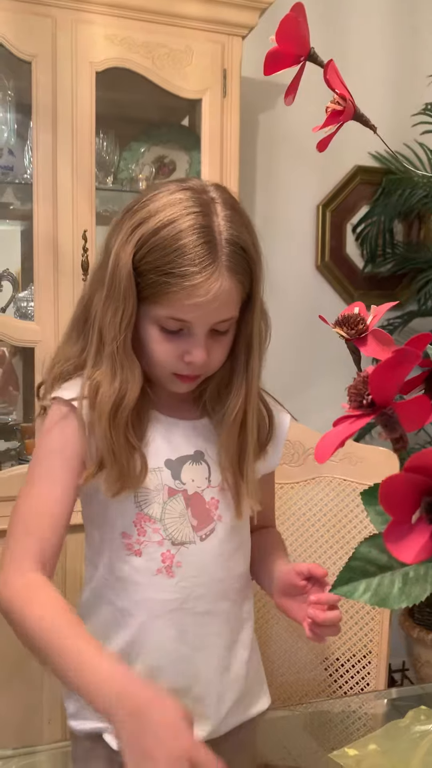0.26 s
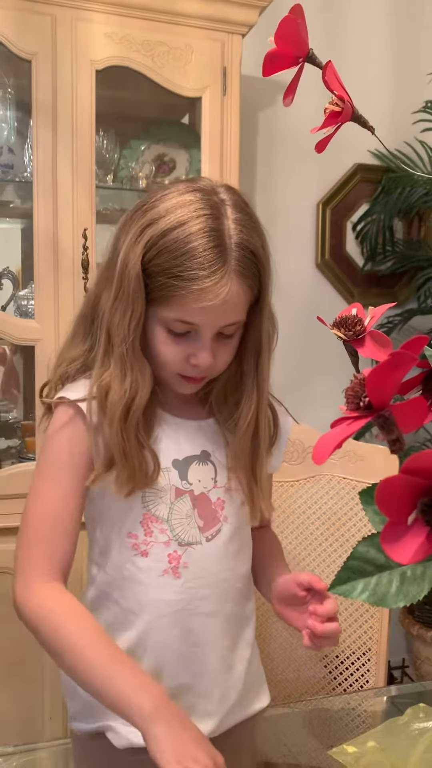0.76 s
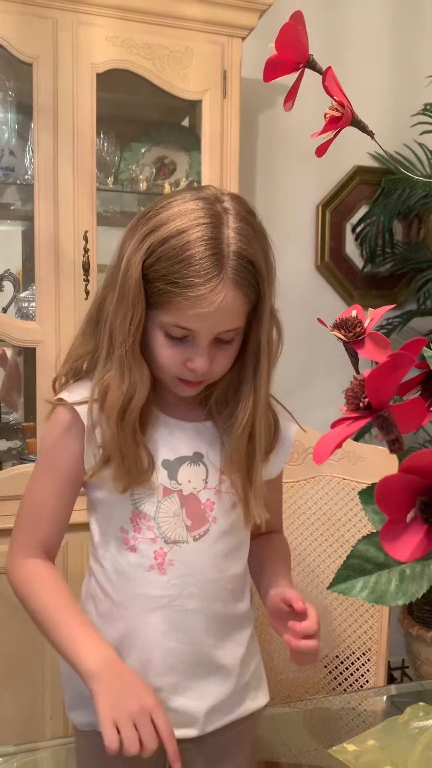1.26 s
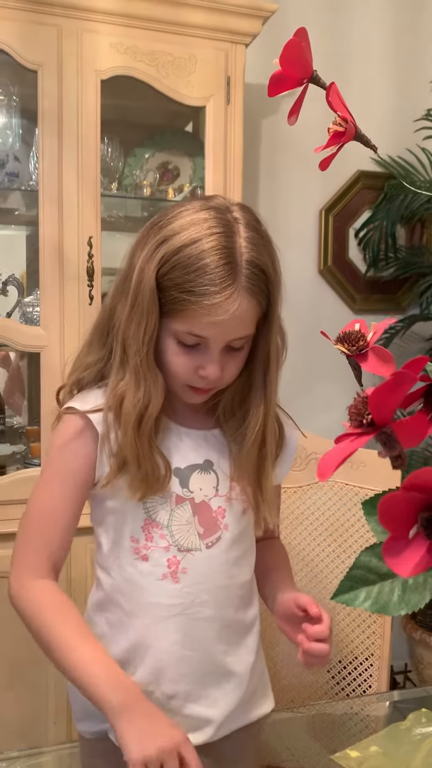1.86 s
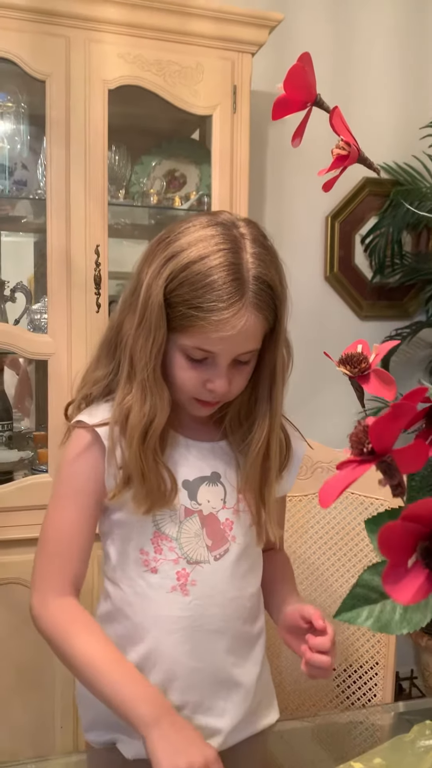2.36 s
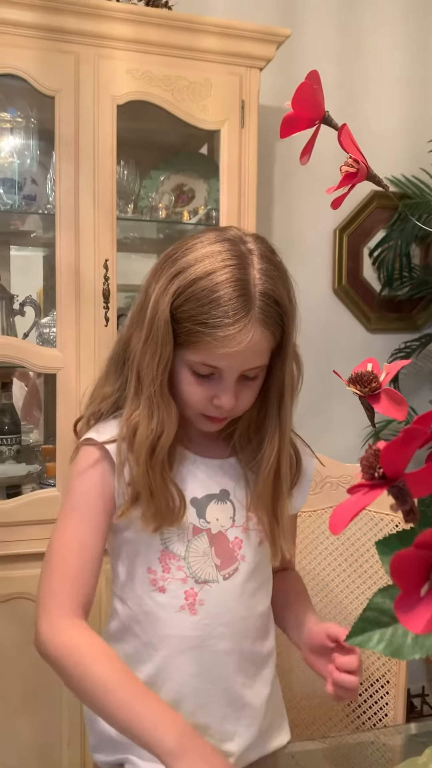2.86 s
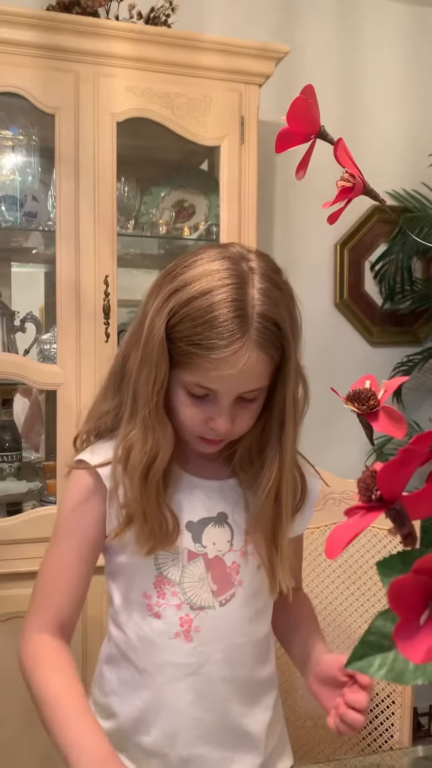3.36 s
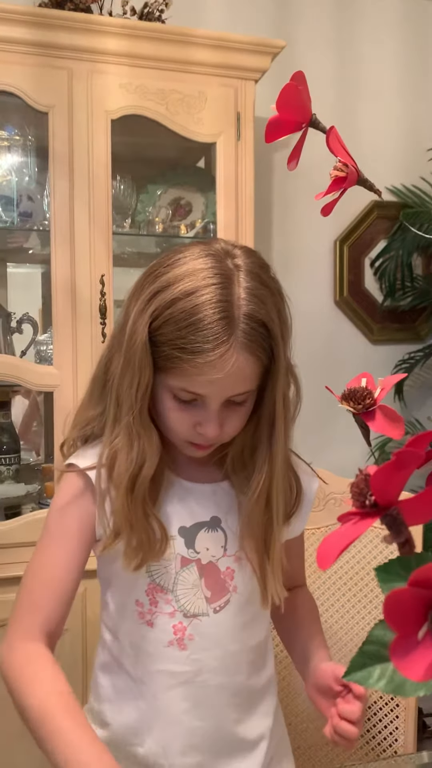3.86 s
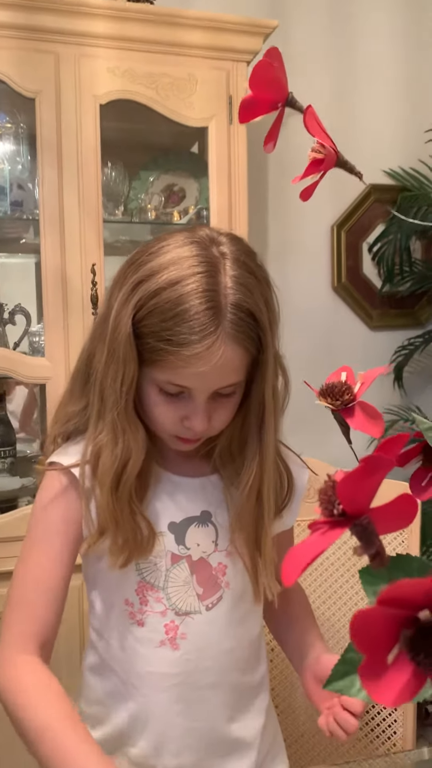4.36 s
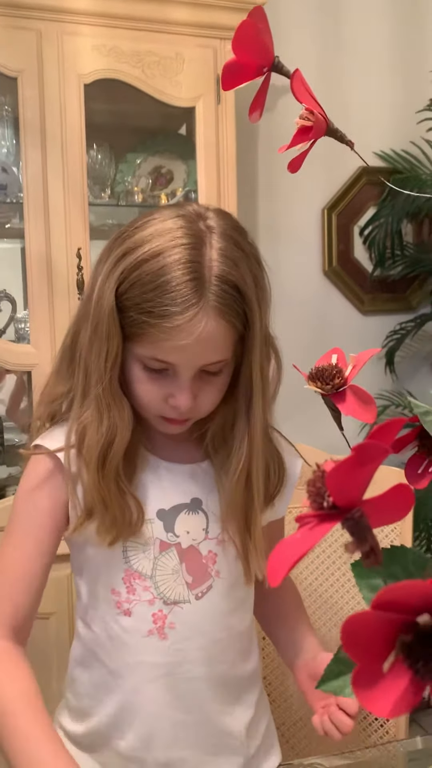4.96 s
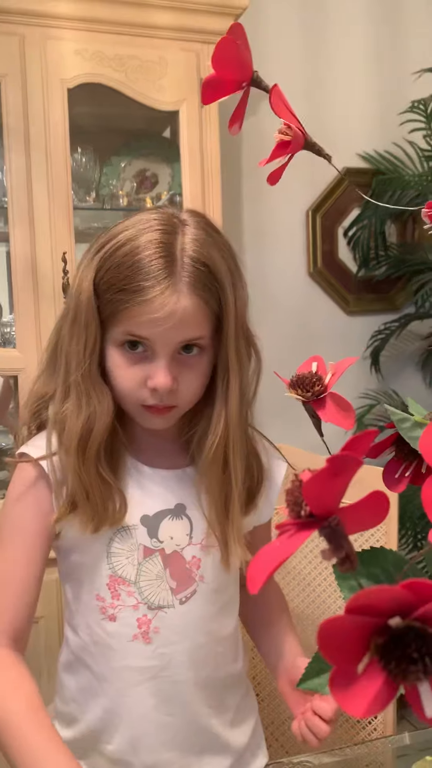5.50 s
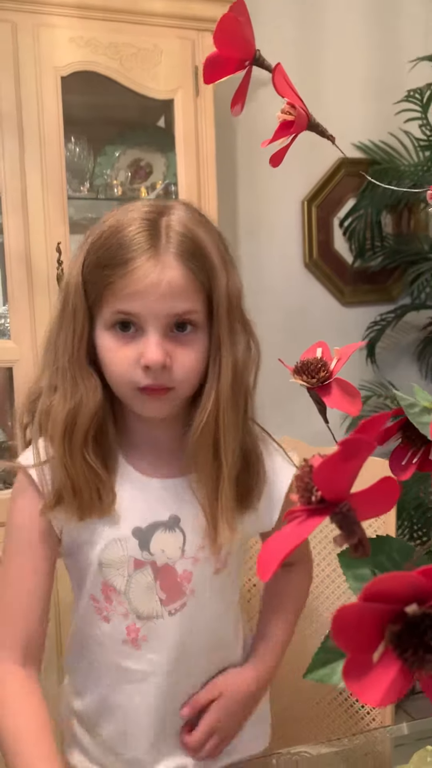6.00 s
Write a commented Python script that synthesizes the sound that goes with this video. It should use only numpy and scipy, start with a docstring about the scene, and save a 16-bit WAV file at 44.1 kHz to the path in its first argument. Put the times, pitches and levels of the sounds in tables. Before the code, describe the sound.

In a quiet room, slime pressed with a finger gives scattered bright, wet cracks and pops, some loud and some tiny, with a brief echo. Under them run soft room air, a very faint clock ticking on the left and the rumble of a hand holding the microphone. In the second half, low handling thumps grow stronger, dull knocks come from across the room, and a cluster of small dry clicks sounds close by.

```python
"""Poking slime in a quiet room

A finger pokes soft slime on a table: trapped air bursts with a bright crack and a short hollow ring,
and the room echoes it. A pendulum clock ticks to the left, small dry ticks sound close by, and dull
knocks come from across the room. A hand holding the microphone adds rumble and low thumps.
Under it all lie soft room air, hiss and faint whistles."""
import sys
import numpy as np
from scipy import signal
from scipy.fft import rfft, irfft
from scipy.io import wavfile
from scipy.ndimage import uniform_filter1d

SR = 44100
rng = np.random.default_rng(int(sys.argv[2]) if len(sys.argv) > 2 else 0)


def int16_out(signal):
    """Quantize to a 16-bit WAV file."""
    q = np.round(np.clip(np.atleast_2d(signal).T, -1, 1) * 32767)
    wavfile.write(sys.argv[1], SR, q.astype(np.int16))


N = 275007


def from_db(db):
    """Turn decibels into a number to multiply a sound by."""
    return 10 ** (np.asarray(db) / 20)


def rms_one(x):
    """Scale a sound so that its average strength (rms) is 1."""
    return x / np.sqrt(np.mean(x ** 2) + 1e-20)


def at_hz(table, hz, column=1):
    """Read a table at any frequency, sliding between its rows on a musical scale."""
    table = np.array(table)
    return np.interp(np.log(hz), np.log(table[:, 0]), table[:, column])


def band(x, low_hz, high_hz):
    """Keep the part of a sound between two frequencies."""
    return signal.sosfilt(signal.butter(2, [low_hz, high_hz], "band", fs=SR, output="sos"), x)


def ring(hz, fade_cycles, rise_cycles):
    """A tone that rises quickly and dies away, with a peak of 1."""
    turns = np.arange(int(.03 * SR)) / SR * hz
    wave = np.sin(2 * np.pi * turns) * np.exp(-turns / fade_cycles) * (1 - np.exp(-turns / rise_cycles))
    return wave / np.abs(wave).max()


def add(out, start, wave):
    """Mix a sound in at a start time in seconds."""
    at = round(start * SR)
    wave = wave[..., :N - at]
    out[..., at:at + wave.shape[-1]] += wave


def sides(pan_db):
    """Left and right gains that make the left louder by pan_db."""
    return from_db([[pan_db / 2], [-pan_db / 2]])


# How alike the two sides are. Each row: frequency in Hz, likeness from 0 (unrelated) to 1 (the same).
LIKENESS = [(30, 0.73), (100, 0.99), (290, 0.93), (640, 0.79), (1200, 0), (15000, 0.33)]

def shaped_noise(spectrum, size):
    """Stereo noise with a given tone colour and rms 1, alike in the bass and wide in the treble."""
    hz = np.maximum(np.arange(size // 2 + 1) * SR / size, 1)
    middle, side = rfft(rng.standard_normal((2, size)))
    alike = np.clip(at_hz(LIKENESS, hz), 0, 1)
    pair = np.sqrt(1 + alike) * middle + np.sqrt(1 - alike) * side * [[1], [-1]]
    return rms_one(irfft(pair * from_db(at_hz(spectrum, hz)), size))


# The tone colour of room air and microphone hiss. Each row: frequency in Hz, relative level in dB.
AIR_COLOUR = [(76, -65), (130, -30.5), (322, -6.5), (427, -1.5), (565, 3), (720, -2.5), (850, -9),
              (1300, -19), (2300, -24.5), (5500, -26.5), (8500, -30.5), (10300, -29), (12500, -28.5),
              (14300, -33.5), (15200, -38)]
# Faint whistles. Each row: pitch in Hz, width in Hz, level in dB, left over right in dB.
WHISTLES = [(1615, 10, -94.5, 15.5), (1970, 58, -88.5, 2), (6820, 840, -83, 11)]
AIR_DB = -67.5

def room_air():
    """The steady hush of the room, with narrow bands of noise that whistle."""
    out = from_db(AIR_DB) * shaped_noise(AIR_COLOUR, N)
    for hz, width_hz, db, pan_db in WHISTLES:
        whistle = band(rng.standard_normal((2, N)), hz - width_hz / 2, hz + width_hz / 2)
        out += from_db(db) * sides(pan_db) * rms_one(whistle)
    return out


# How unsteady the hand is. Each row: time in seconds, rumble level in dB.
HAND_MOTION = [(0, -52), (.5, -62.5), (.95, -56.5), (1.18, -54.5), (1.38, -61.5), (1.9, -54.5), (2.5, -57),
               (2.78, -50), (2.979, -66.5), (3.09, -48), (3.35, -57.5), (4.45, -58.5), (4.88, -45),
               (5.03, -50), (5.14, -45), (5.3, -51), (5.699, -52), (5.85, -50.5), (6.24, -57)]
# The tone colours of the rumble and the shuffle. Each row: frequency in Hz, relative level in dB.
RUMBLE_COLOUR = [(8.8, -27.5), (15, -12.5), (38, 3), (57, -8.5), (77, -7), (200, -36.5), (260, -60.5),
                 (440, -120)]
SHUFFLE_COLOUR = [(50, -40.5), (90, 3), (135, 3), (250, -8), (420, -11), (700, -16.5), (2000, -58.5),
                  (16000, -92)]
CALM_RUMBLE_DB, CALM_SHUFFLE_DB = -58.5, -74.5
SETTLE_DB, SETTLE_S = -33.5, 0.073   # the grip settling: level next to its thump, time to its peak

def hand_rumble():
    """The hand rumbles as it moves; a higher shuffle rises with it and lingers after every thump."""
    times, levels_db = np.transpose(HAND_MOTION)
    rumble_db = np.interp(np.arange(N) / SR, times, levels_db)
    shuffle_gain = from_db(CALM_SHUFFLE_DB + 1.5 * (rumble_db - CALM_RUMBLE_DB))
    t = np.arange(SR) / SR
    settle = t / SETTLE_S * np.exp(1 - t / SETTLE_S)
    for start, db, *_ in THUMPS:
        add(shuffle_gain, start, from_db(db + SETTLE_DB) * settle)
    rumble = from_db(rumble_db) * shaped_noise(RUMBLE_COLOUR, N)
    return rumble + shuffle_gain * shaped_noise(SHUFFLE_COLOUR, N)


# Bursting air pockets. Each row: start in seconds, crack peak in dB, the crack's upper tone next to its
# main tone in dB, sputter in dB, sputter pitch in Hz, smack in dB, low ring in dB, middle ring in dB,
# its pitch in Hz, high ring in dB, its pitch in Hz, share sent to the room in dB.
# Sputter, smack and ring levels are starting values: filters and gains below change them.
POPS = [(0.2051, -42, -16, -43.5, 8000, -50, -52, -43, 1170, -52, 2150, -2.5),
        (.245, -21.5, -16, -50, 5900, -45.5, -32.5, -34, 1056, -37.5, 1860, -6.5),
        (.9456, -29, -7, -39.5, 6230, -45, -62.5, -44, 1410, -46, 1720, -2),
        (.972, -3.5, -3.5, -37, 6450, -38, -36.5, -32.5, 1123, -33, 1780, -6),
        (1.7381, -22.5, -2, -39, 6380, -45, -39.5, -35.5, 1310, -35.5, 1990, -2.5),
        (2.1665, -26, 0, -44.5, 6300, -45.5, -72.5, -36.5, 1470, -39, 1910, -2),
        (2.5803, -30.5, 2.5, -41.5, 6060, -51, -36.5, -41, 1043, -46, 1940, -3),
        (3.0523, -40.5, -20, -66.5, 5050, -65, -52.5, -53, 1110, -60.5, 1830, 0),
        (3.8848, -15.5, -8, -40.5, 5630, -41.5, -38.5, -35.5, 1125, -44, 1900, -5),
        (4.2881, -33, -11, -56, 6160, -59, -41, -57, 930, -55.5, 1910, -3.5),
        (4.7799, -33, -10.5, -50.5, 7800, -60, -52.5, -45, 1110, -48.5, 1740, -5.5),
        (5.4519, -18.5, -7.5, -52, 5400, -46, -39, -40, 1080, -37, 1920, -2.5),
        (6.0471, -34, -7, -57.5, 7260, -64.5, -53, -75, 910, -50, 1860, -2)]
CRACK_HZ, CRACK_TOP_HZ, LOW_RING_HZ = 9520, 13300, 709
TABLE_ECHO_S, LEFT_LAG_S = .0007, .000218

def slime_pops():
    """The slime's skin tears, then the open hollow rings; the left hears it later, with more ring."""
    out = np.zeros((2, N))
    cut_lows = signal.butter(2, 6000, "high", fs=SR, output="sos")   # a tiny tear cannot make bass
    for (start, crack_db, top_db, sputter_db, sputter_hz, smack_db,
         low_db, middle_db, middle_hz, high_db, high_hz, room_db) in POPS:
        crack = ring(CRACK_HZ, 1.28, 0.91) - from_db(top_db) * ring(CRACK_TOP_HZ, 2.2, 1.7)
        crack = signal.sosfilt(cut_lows, crack)
        crack = from_db(crack_db) * crack / np.abs(crack).max()
        add(crack, TABLE_ECHO_S, from_db(-15) * crack[:600])
        spray = rng.standard_normal(len(crack)) * np.exp(-np.arange(len(crack)) / SR / 0.004)
        sputter = 2 * band(spray, .75 * sputter_hz, 1.3 * sputter_hz)
        droplets = 0.2513 * band(spray, 7500, 15000)
        wet_smack = band(spray, 2800, 4400)
        tear = crack + from_db(sputter_db) * (sputter + droplets) + from_db(smack_db) * wet_smack
        low = from_db(low_db) * ring(LOW_RING_HZ, 1.2, 1.5)
        upper = from_db(middle_db) * ring(middle_hz, 1.36, 2) + from_db(high_db) * ring(high_hz, 2.3, 3)
        direct = tear + from_db(-2.5) * low   # the low ring points up and away, so the room gets more
        add(out[0], start + LEFT_LAG_S, direct + from_db(5) * upper)
        add(out[1], start, direct + from_db(1.5) * upper)
        to_room = from_db(room_db) * (tear + low + upper)
        echo = room_echo(size=26460)   # each spot on the slime stirs the room its own way
        add(out, start, signal.fftconvolve(to_room[None], echo, axes=1))
    return out


# The room's echo. Each row: frequency in Hz, seconds to fade by 60 dB, relative level in dB.
ROOM_ECHO = [(203, 0.29, -9.5), (490, 0.48, -22.5), (1190, 0.53, -27.5), (1990, 0.51, -29.5),
             (3700, 0.4, -17), (6710, 0.44, -31), (10800, 0.19, -28), (13045, 0.18, -32.5),
             (16230, 0.35, -40.5)]
FIRST_WALL_S, SEPARATE_ECHOES_S = .0078, .022

def room_echo(size):
    """The room answers a click: little until the first wall, then separate echoes, then fading noise."""
    out, t = np.zeros((2, size)), np.arange(size) / SR
    edges_hz = 100 * 2 ** np.arange(0, 7.6, .5)   # half an octave apart
    noises = [shaped_noise([(10, 0), (20000, 0)], size) for _ in range(2)]
    for k, (low, high) in enumerate(zip(edges_hz, edges_hz[1:])):
        hz = np.sqrt(low * high)
        fade = from_db(at_hz(ROOM_ECHO, hz, column=2) - 60 * t / at_hz(ROOM_ECHO, hz))
        out += band(noises[k % 2], low, high) * fade
    lumps = rms_one(uniform_filter1d(rng.standard_normal(size), size=30))
    separate_echoes = from_db(8 * lumps * np.exp(-t / SEPARATE_ECHOES_S))
    return out * separate_echoes * np.where(t < FIRST_WALL_S, .35, 1)


# Low thumps. Each row: start in seconds, level in dB, first pitch in Hz, last pitch in Hz,
# rise time in seconds, left over right in dB.
THUMPS = [(.25, -52, 140, 120, .012, 2), (.955, -46, 130, 110, .012, 2), (1.645, -46, 60, 45, .012, 2),
          (1.816, -35, 70, 40, .014, 2), (2.714, -55, 500, 300, .002, 2), (2.8095, -29.5, 340, 85, .007, 2),
          (3.082, -42, 90, 60, .015, 2), (3.7435, -28, 340, 75, .008, 2), (3.7925, -35, 200, 55, .009, 2),
          (4.08, -46, 45, 35, .015, 2), (4.787, -25.5, 110, 36, .014, -2), (5.747, -35, 45, 40, .013, 2)]
SLIDE_S = 0.0043

def hand_thumps():
    """A jolt through the hand makes a low tone that swells, slides down in pitch and dies."""
    out, t = np.zeros((2, N)), np.arange(int(.3 * SR)) / SR
    for start, db, first_hz, last_hz, rise_s, pan_db in THUMPS:
        turns = last_hz * t + (first_hz - last_hz) * SLIDE_S * (1 - np.exp(-t / SLIDE_S))
        swell = t / rise_s * np.exp(1 - t / rise_s)
        add(out, start, -from_db(db) * swell * np.sin(2 * np.pi * turns) * sides(pan_db))
    return out


# The tones of the clock's case. Each row: pitch in Hz, relative level in dB, fade time in cycles.
CASE_TONES = [(3920, -4.5, 5.6), (5040, -4, 4), (5960, -5, 5.7)]
FIRST_BEAT_S, BEAT_S = .6197, 1.05435
DROP_DELAY_S = (.0148, .0106)   # the clock's toothed wheel drops later on tick than on tock

def pendulum_clock():
    """Each beat is a knock and then a softer drop, both ringing the same case."""
    out = np.zeros((2, N))
    click = sum(from_db(db) * ring(hz, cycles, 1.2) for hz, db, cycles in CASE_TONES)
    click = click * sides(pan_db=21.5)
    for beat in range(6):
        start = FIRST_BEAT_S + beat * BEAT_S
        add(out, start, from_db(-62) * click)
        add(out, start + DROP_DELAY_S[beat % 2], from_db(-65) * click)
    return out


# Small ticks close by. Each row: start in seconds, main tone's level in dB, its pitch in Hz,
# left over right in dB, fade time in cycles.
TICKS = [(0.697, -58, 6460, -3, 1.6), (4.477, -54, 7450, 0, 0.86), (5.0163, -54.5, 4730, 3, 1.5),
         (5.3861, -38.5, 3520, 8.5, 2.7), (5.3878, -38, 3550, -9, 1.9), (5.654, -50, 3830, 8, 2.2),
         (5.722, -50, 9300, 2, 5), (5.766, -50.5, 5360, 10, 2.7), (5.7797, -50, 6400, -3, 4.1)]
TAIL_DB, TAIL_FADE_S = -33.5, 0.24

def dry_ticks():
    """Two clashing tones last a few cycles and leave a faint, short tail of noise."""
    out, t = np.zeros((2, N)), np.arange(2600) / SR
    for start, db, hz, pan_db, cycles in TICKS:
        tick = from_db(db) * (ring(hz, cycles, 3) + .45 * ring(1.33 * hz, cycles, 3))
        tail = from_db(TAIL_DB - 60 * t / TAIL_FADE_S) * rng.standard_normal((2, len(t)))
        add(out, start, tick * sides(pan_db))
        add(out, start, signal.fftconvolve(tick[None], tail, axes=1))
    return out


# Knocks and scuffs across the room. Each row: start in seconds, level in dB, brightness in dB,
# swell time in seconds.
KNOCKS = [(3.087, -62, -44, 0.0036), (4.302, -53, -59, 0.0026), (4.645, -41, -23.5, 0.0078),
          (5.738, -56, 1.5, 0.022), (5.812, -50, -3, 0.0069), (6.018, -49.5, -46, 0.0037)]
# The tone colour of a plain knock. Each row: frequency in Hz, relative level in dB.
KNOCK_COLOUR = [(59, -45), (100, 1.5), (300, 4), (514, 1.5), (700, -9), (2000, -24.5), (2500, -36),
                (6500, -47.5), (10000, -56), (14000, -66), (15500, -77)]
PLAIN_BRIGHTNESS_DB, LUMP_DB, KNOCK_FADE_S = -39, 2, 0.58

def far_knocks():
    """Lumpy noise swells and dies away with the room; a brighter knock has more treble."""
    out, t = np.zeros((2, N)), np.arange(SR // 2) / SR
    for start, db, brightness_db, swell_s in KNOCKS:
        tilt_db = brightness_db - PLAIN_BRIGHTNESS_DB   # comes in over the four octaves above 500 Hz
        colour = [(hz, level + tilt_db * np.clip(np.log2(hz / 500) / 4, 0, 1))
                  for hz, level in KNOCK_COLOUR]
        lumps = rms_one(uniform_filter1d(rng.standard_normal(len(t)), size=90))
        fade = from_db(db + LUMP_DB * lumps * np.exp(-t / 0.059) - 60 * t / KNOCK_FADE_S)
        swell = 1 - np.exp(-t / swell_s)
        add(out, start, fade * swell * shaped_noise(colour, len(t)))
    return out


def scene():
    """All the short sounds, laid over the hand's rumble and the hush of the room."""
    short_sounds = slime_pops() + dry_ticks() + pendulum_clock() + hand_thumps() + far_knocks()
    return short_sounds + hand_rumble() + room_air()


SHARED_ABOVE_HZ, TREBLE_FADE_HZ, CUTOFF_HZ = 8000, 15000, 16700

def record(dry):
    """Both sides share one treble, the left a little late; the highest sounds fade, then are cut."""
    left, right = rfft(dry)
    hz = np.arange(len(left)) * SR / N
    shared = 1 / (1 + (SHARED_ABOVE_HZ / (hz + 1)) ** 24)   # 0 in the bass, 1 in the high treble
    late_right = right * np.exp(-2j * np.pi * hz * LEFT_LAG_S)
    left = np.sqrt(1 - shared ** 2) * left + shared * late_right
    # The highest treble fades away softly.
    treble_fade = signal.butter(4, TREBLE_FADE_HZ, fs=SR, output="sos")
    steep_cut = signal.cheby2(12, 70, CUTOFF_HZ, fs=SR, output="sos")
    softened = signal.sosfilt(treble_fade, irfft([left, right], N))
    return signal.sosfilt(steep_cut, softened)


dry = scene()
out = record(dry)
int16_out(out)
```